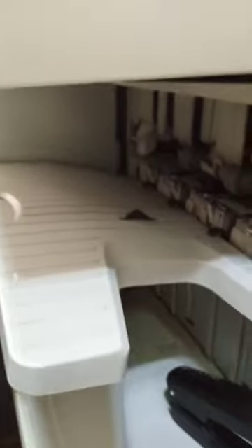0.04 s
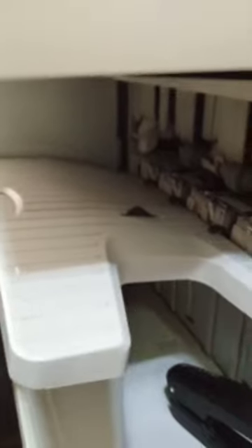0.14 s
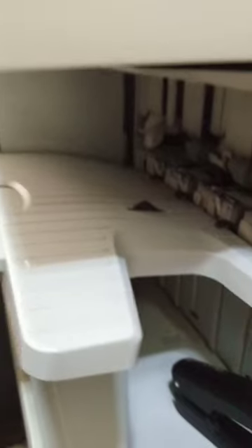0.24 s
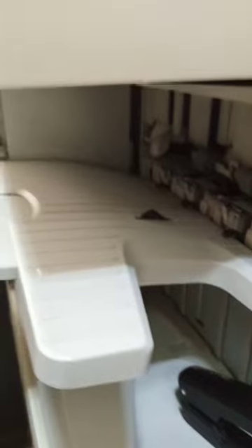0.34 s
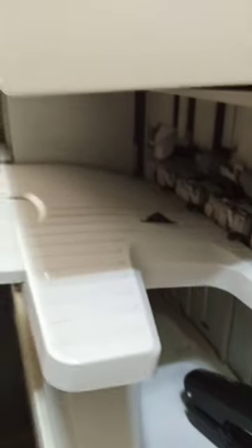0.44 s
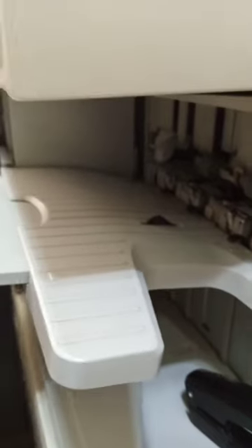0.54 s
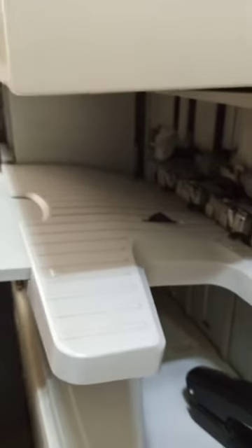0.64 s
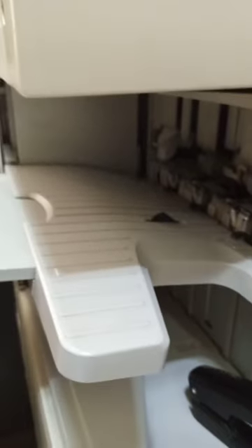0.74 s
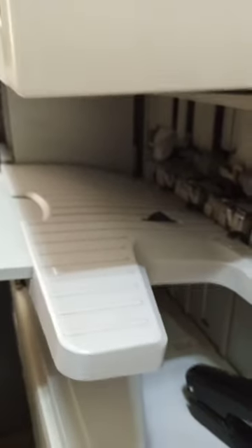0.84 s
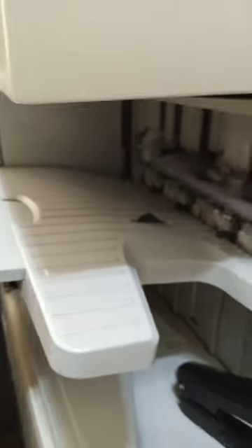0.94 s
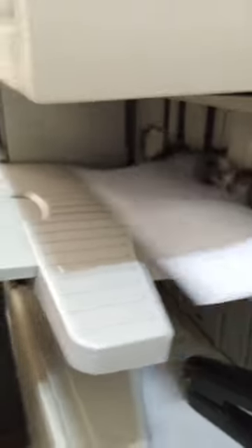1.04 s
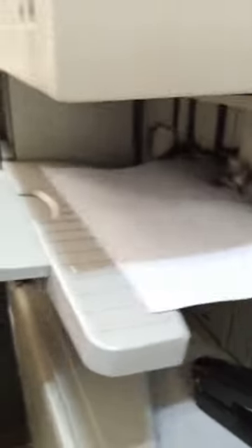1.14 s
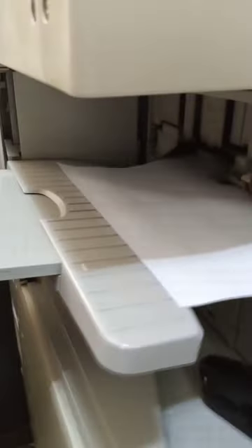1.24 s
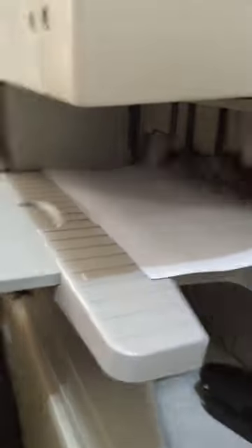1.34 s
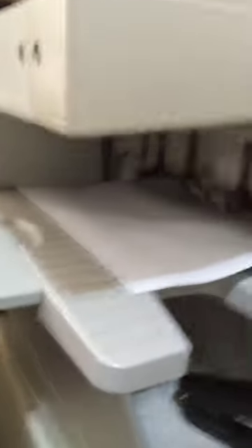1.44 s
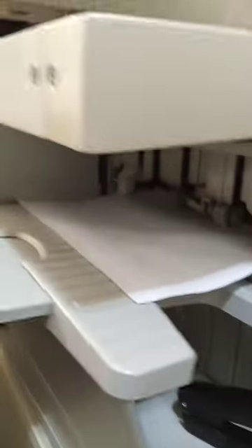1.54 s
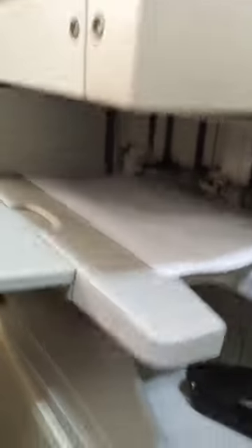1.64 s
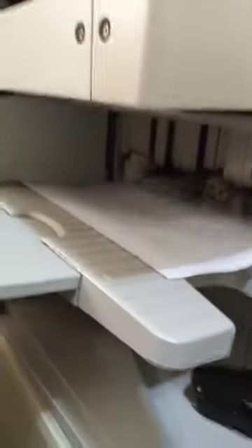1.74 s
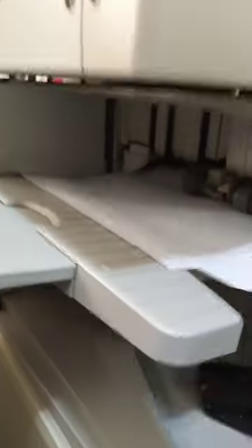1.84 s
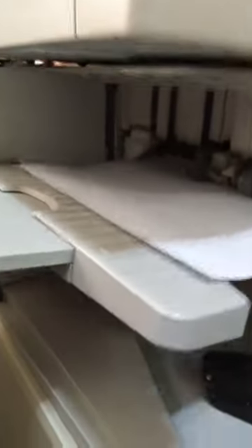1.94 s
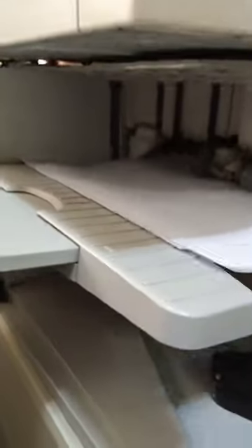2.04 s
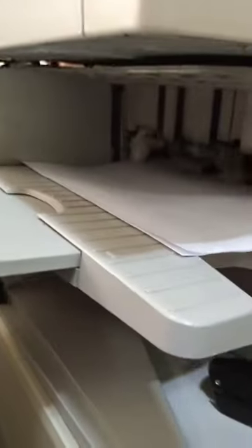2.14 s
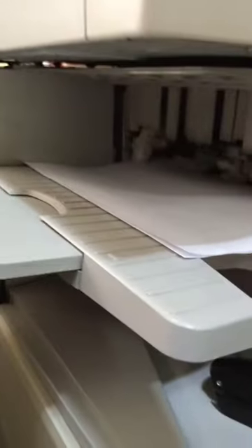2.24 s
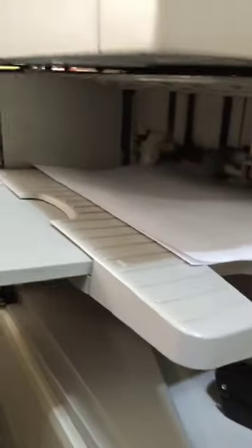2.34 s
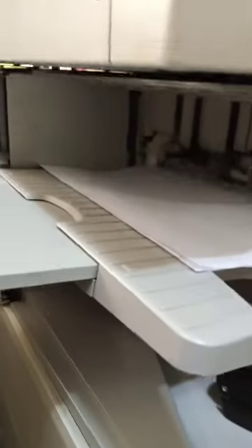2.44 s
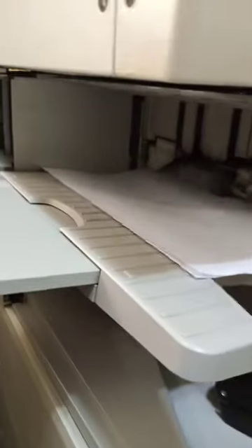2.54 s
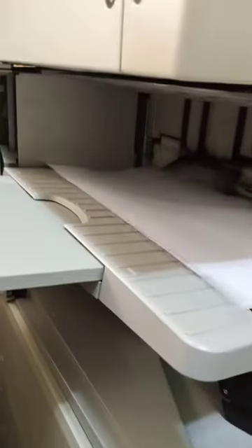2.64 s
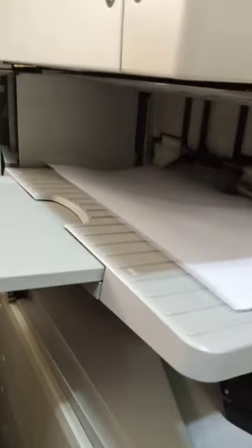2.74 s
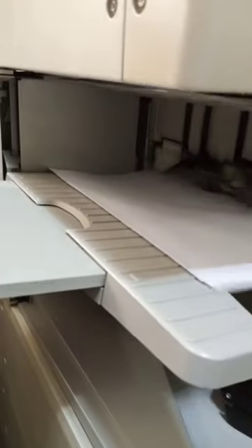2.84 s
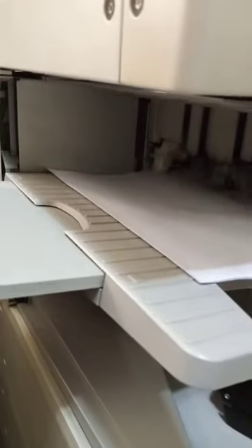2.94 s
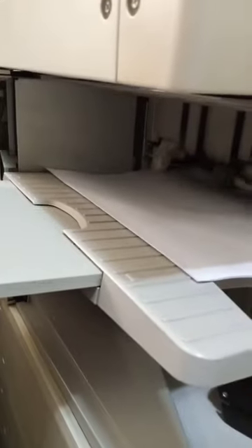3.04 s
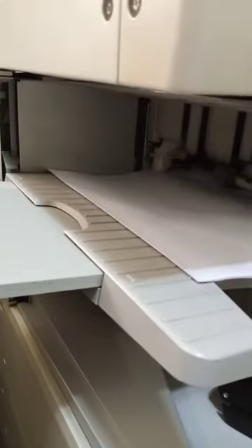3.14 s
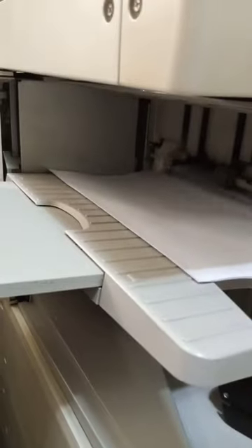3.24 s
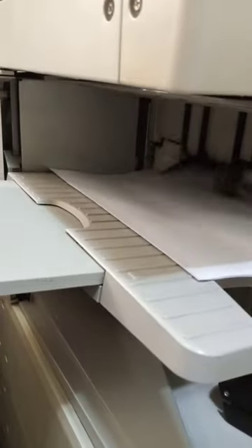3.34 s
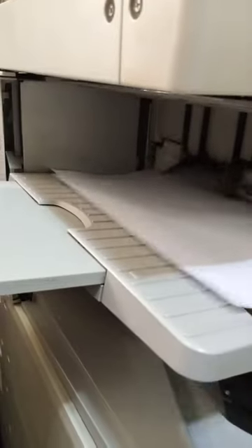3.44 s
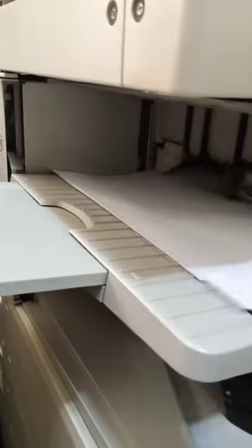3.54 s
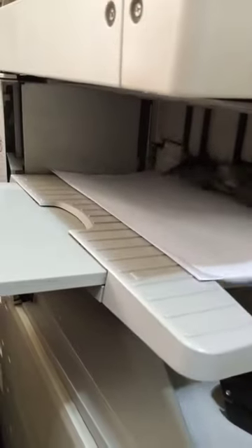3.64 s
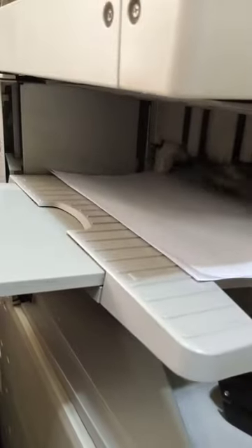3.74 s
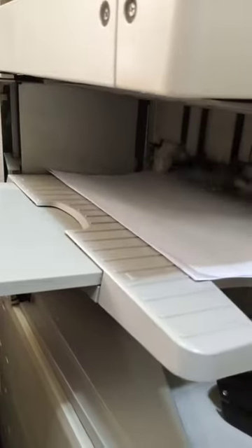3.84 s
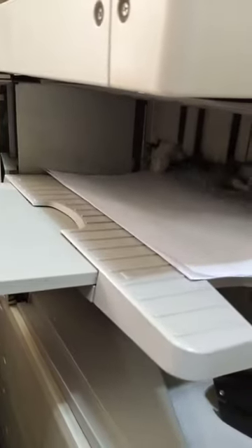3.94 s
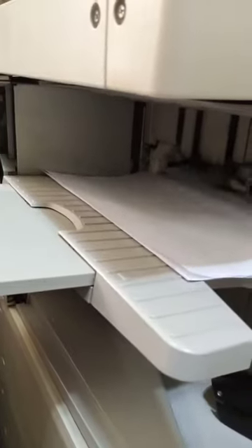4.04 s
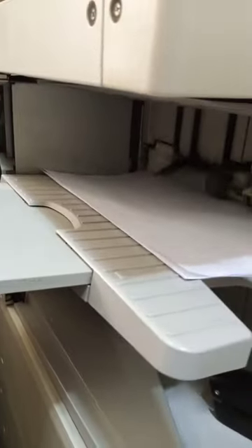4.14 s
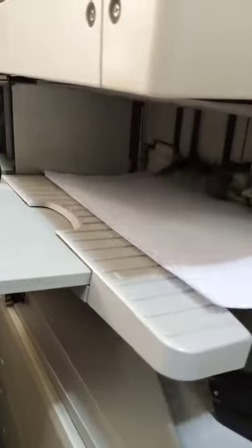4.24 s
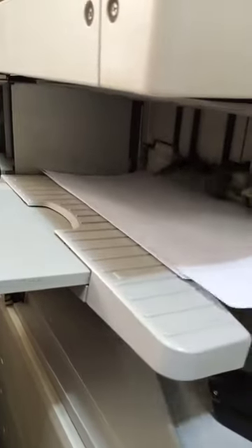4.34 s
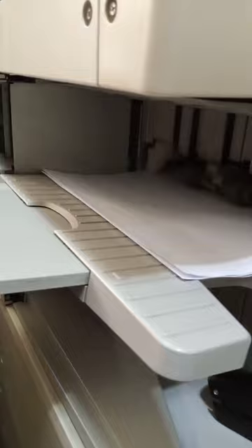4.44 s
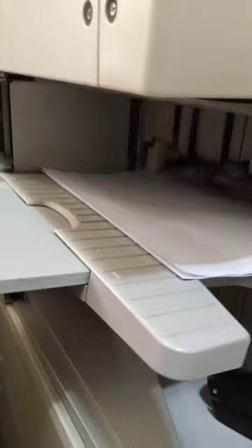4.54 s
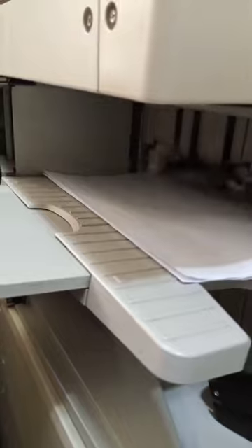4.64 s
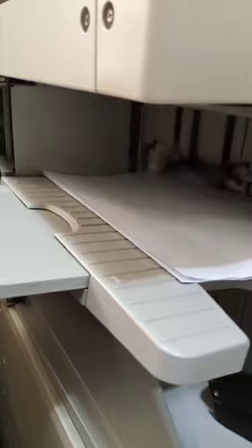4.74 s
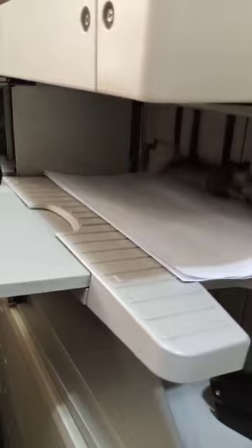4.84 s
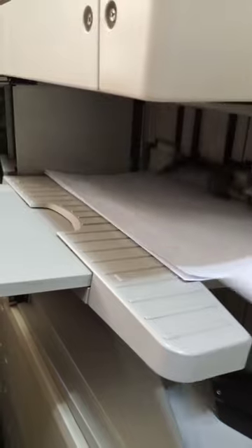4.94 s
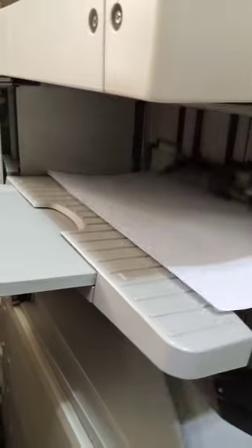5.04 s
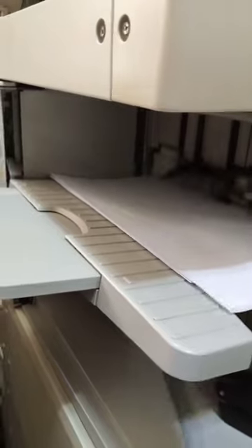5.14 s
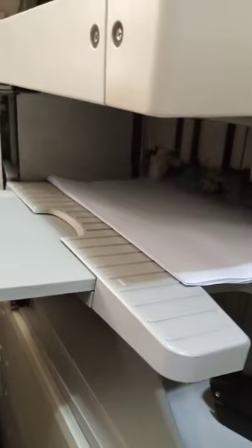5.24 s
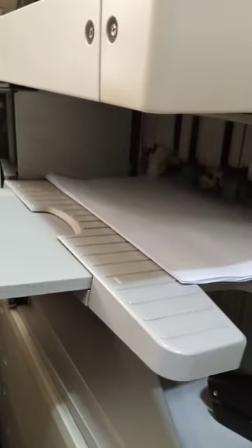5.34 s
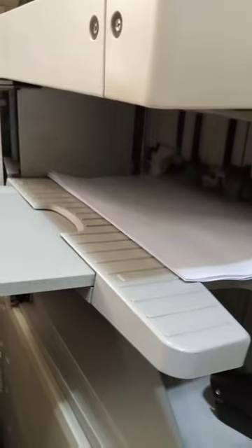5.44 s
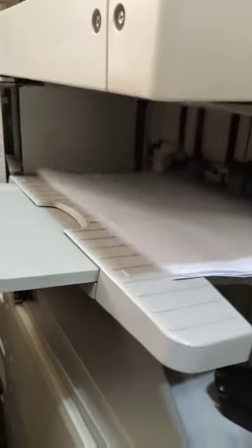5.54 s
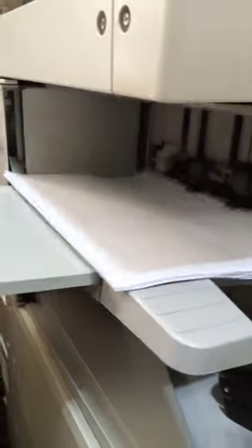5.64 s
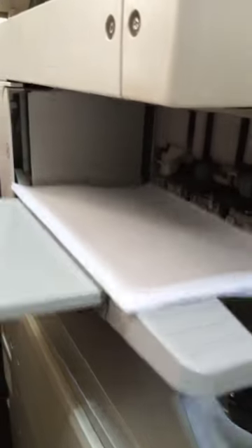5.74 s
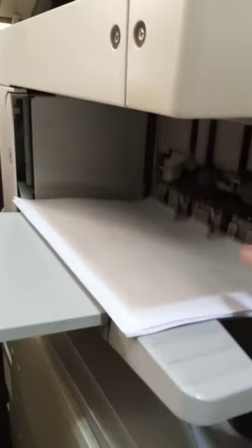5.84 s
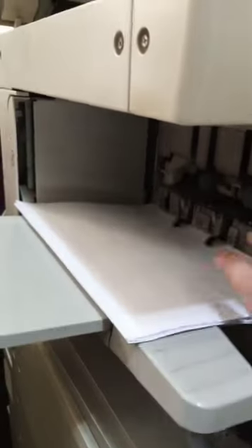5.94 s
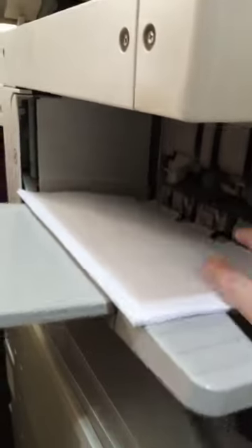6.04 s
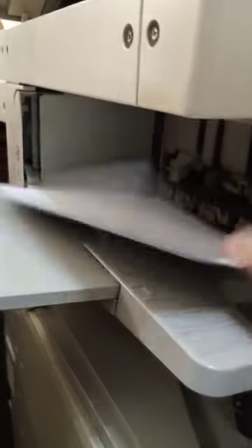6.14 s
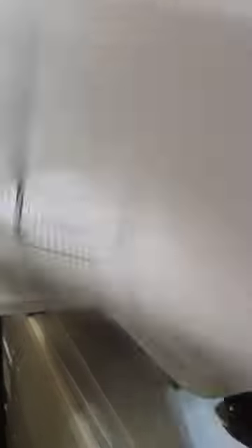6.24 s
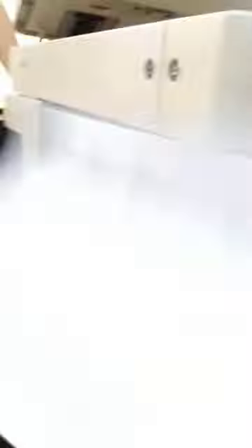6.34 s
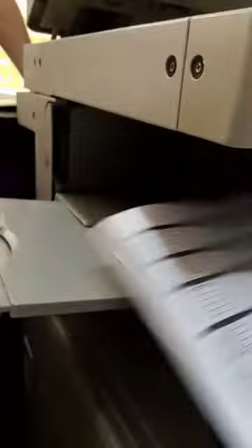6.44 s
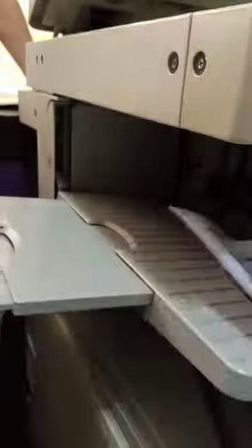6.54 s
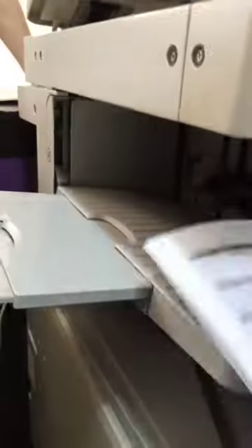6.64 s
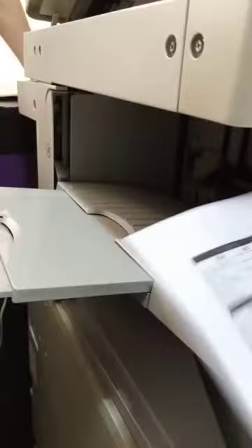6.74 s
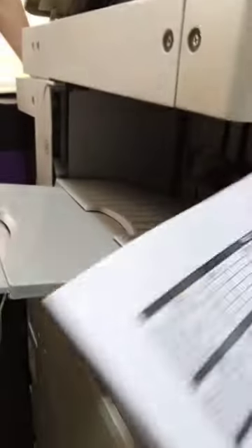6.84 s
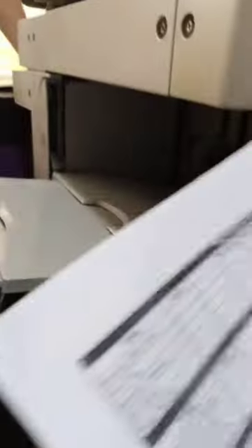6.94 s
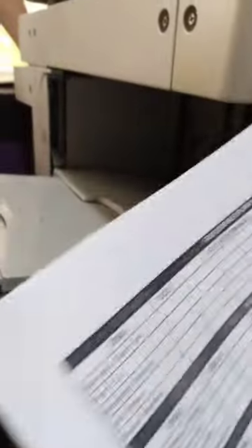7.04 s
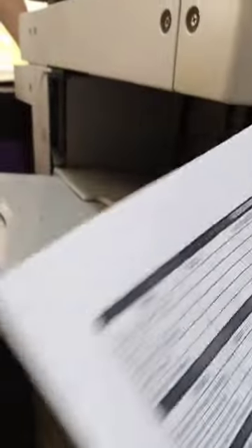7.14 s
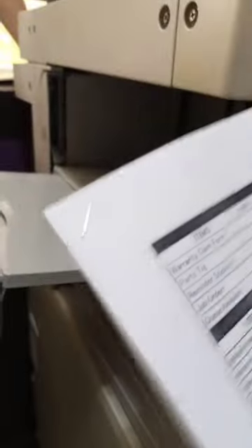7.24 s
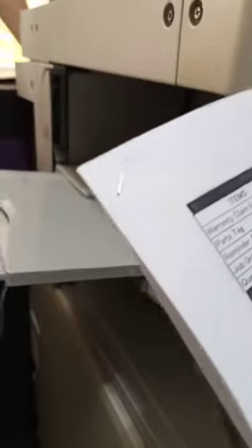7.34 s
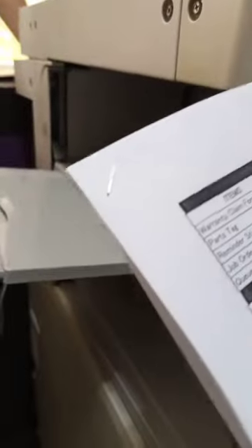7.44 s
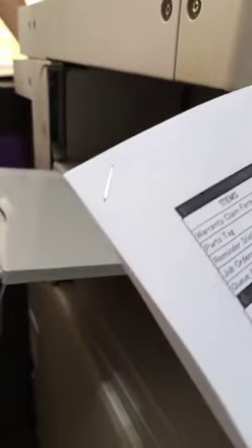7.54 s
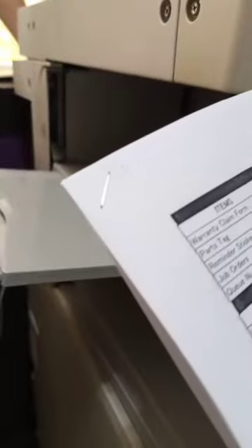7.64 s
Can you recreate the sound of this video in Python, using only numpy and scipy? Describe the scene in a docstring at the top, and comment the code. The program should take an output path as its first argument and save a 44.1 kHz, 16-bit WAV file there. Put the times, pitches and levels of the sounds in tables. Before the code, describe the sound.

A soft mechanical whirr with tiny high roller squeaks and dull cabinet knocks comes first. Then a regular cycle of paper slap, plastic fence tap and paired rubbery slaps repeats six times, with brief motor whines. Finally the stack is clamped, pushed out and handled, crackling and snapping irregularly. Close, dry microphone, very short room tail.

```python
"""A fan and a humming drive with thin roller squeaks and ticks, then sheets slapping onto a copier's finisher tray.
Paper slides as grainy friction noise; joggers, paddles and guides clack as noise bursts ringing through plastic.
The stapled set is pushed out and lifted by hand: each buckle is a crack with random modes of its own.
Fan and gears run throughout as coloured noise; the microphone is close to the plastic tray bay in a small office."""
import sys
import numpy as np
from scipy import signal
from scipy.fft import rfft, irfft, next_fast_len
from scipy.io import wavfile
from scipy.ndimage import uniform_filter1d, map_coordinates

SR = 44100
rng = np.random.default_rng(int(sys.argv[2]) if len(sys.argv) > 2 else 0)


def transcribe(u):
    """Save the signal u as a 16-bit wav file named by the first command-line argument.

    u: samples, shape (n,) or (channels, n), limited to [-1, 1]; the rate is SR.
    q: integer samples, one column per channel.
    """
    v = np.clip(np.atleast_2d(u).T, -1, 1)
    q = np.round(v * 32767).astype(np.int16)
    wavfile.write(sys.argv[1], SR, q)


N = 338688

# the sheets, each landing, jogged square and pulled back by two paddle blades: jog t/s, landing level/dB,
# landing f/Hz, landing t60/s, paddle delay after the jog/s, first and second blade level/dB, drag level/dB
SHEETS = [(1.294, -28.5, 3450, .095, 0.18, -24, -24.5, -40.5),
          (2.063, -26.5, 3290, 0.11, .183, -27.5, -34, -44),
          (2.829, -21.5, 3730, 0.05, 0.2, -22.5, -23.5, -46.5),
          (3.616, -24, 3540, 0.07, 0.19, -24, -31, -43),
          (4.387, -21.5, 2470, 0.03, 0.1987, -25, -24.5, -51),
          (5.173, -28, 2330, 0.07, 0.18, -23.5, -41, -47.5)]
# spectrum of cracking paper: f/Hz, density/dB
CRACK_SPECTRUM = [(900, -92), (1450, -18.5), (1750, -10), (2070, 4.5), (2400, 1), (2800, -4.5), (3900, 1.5),
                  (4450, 0), (5060, -14.5), (6000, -32), (7500, -39), (10000, -52)]
# spectrum of the fizz at a sheet's edge: f/Hz, density/dB
FIZZ_SPECTRUM = [(4000, -22.5), (5600, 10.5), (6600, -1), (8000, -15.5), (10000, -17), (13000, -25.5),
                 (14200, -13), (15200, -7.5), (15700, -10.5)]
# plastic walls of the tray bay: f/Hz, width/Hz, level/dB
BAY_WALLS = [(762, 70, 1), (980, 28, 2), (1291, 83, 4)]
# resonances of the gear train: f/Hz, width/Hz, level/dB
GEAR_MODES = [(2080, 240, 2), (2880, 120, -20), (3580, 320, -1), (4540, 290, -2.5), (5500, 540, -9.5)]
LEAD_S = 0.025  # run-up in every contact envelope before its peak


def landings(fizz_db=-27):
    """Each sheet drops from the exit rollers and slaps the tray."""
    lead_s = 0.166  # a sheet lands this long before its jog
    rows = [(s - lead_s, db, hz, fizz_db, t60) for s, db, hz, t60, *_ in SHEETS]
    return contacts(rows, crest_s=0.001, swell_s=0.0034, hold_s=0.0028, sheet_width_hz=31, sheet_share=1.8,
                    crack_db=-5.5, panel_db=-23, fizz_db=-0.5, tail_db=-30, tail_t60=0.16)


def jogger(crest_s=0.001064, level_db=-26.5):
    """From the second sheet on, a plastic fence slaps the edge of the stack; fence and bay walls ring."""
    # modes of the fence: f/Hz, width/Hz, level/dB
    fence_modes = [(1296, 150, -13), (2087, 184, -0.5), (2370, 84, 2), (2860, 100, -2.5), (3550, 126, -3),
                   (3680, 190, -1.5), (4210, 310, -3.5)]
    out = np.zeros(N)
    envelope = blow(swell_s=0.0065, hold_s=0.0061, t60=0.025, tail_db=-21, tail_t60=0.14)
    for s, *_ in SHEETS[1:]:
        ring = burst(lambda f: resonances(fence_modes, f) / (1 + (f / 5500) ** 8), envelope)
        panel = burst(lambda f: resonances(BAY_WALLS, f) * (f < 5000), envelope)
        fizz = burst(lambda f: amp(along(FIZZ_SPECTRUM, f)), envelope)
        slap = ring + amp(-13.5) * panel + amp(-16.5) * fizz
        add(out, s + crest_s - LEAD_S, amp(level_db) * slap)
    return out


def paddle():
    """Two rubber blades slap each sheet in turn; flaps and levers tap at fixed points of the cycle."""
    # light taps of flaps and levers: delay after the jog/s, level/dB, f/Hz
    cycle_taps = [(-.069, -31.5, 3960), (.325, -39.5, 4160), (.383, -44.5, 2300), (.535, -46, 2140)]
    blade_gap_s, blade_hz, blade_t60, blade_fizz_db = 0.051, 3913, 0.068, -16.5
    tap_t60, tap_fizz_db = 0.042, -23
    rows = []
    for s, *_, delay, first_db, second_db, _ in SHEETS:
        for k, db in enumerate([first_db, second_db]):
            rows.append((s + delay + k * blade_gap_s, db, blade_hz, blade_fizz_db, blade_t60))
        rows += [(s + after, db, hz, tap_fizz_db, tap_t60) for after, db, hz in cycle_taps]
    return contacts(rows, crest_s=0.001, swell_s=0.0056, hold_s=0.0028, sheet_width_hz=38, sheet_share=2.0,
                    crack_db=-6, panel_db=-37, fizz_db=-1.5, tail_db=-32, tail_t60=0.15)


def clacks():
    """Sheets catch on the guides and the stack is clamped and stapled, each a short crack."""
    # the catches, clamping and stapling: t/s, level/dB, f/Hz, relative fizz/dB, t60/s
    clack_rows = [(1.2531, -24.5, 2460, -26, 0.018), (1.273, -21.5, 1976, -34.5, 0.038),
                  (2.0333, -30.5, 2370, -27, 0.052), (2.1326, -27.5, 4000, -22, 0.18),
                  (2.9437, -22, 2740, -14, 0.019), (3.6915, -30, 4170, -31, 0.022),
                  (3.7174, -29.5, 3980, -15, 0.033), (4.4662, -29, 4330, -22.5, 0.15),
                  (5.2285, -31, 4270, -21, .034), (5.2674, -23.5, 4470, -15, .027),
                  (5.5209, -19.5, 2730, -26, 0.062), (5.6146, -21, 2313, -31, 0.085)]
    return contacts(clack_rows, crest_s=0.000984, swell_s=0.0035, hold_s=0.0026, sheet_width_hz=29,
                    sheet_share=1.1, crack_db=-5.5, panel_db=-31, fizz_db=0.0, tail_db=-46, tail_t60=0.15)


def snaps():
    """The stapled set buckles as it is pushed out and lifted, snapping from one bend to another."""
    # the buckles: t/s, level/dB, f/Hz, relative fizz/dB, t60/s
    snap_rows = [(5.7508, -29, 4500, -19, 0.096), (5.7967, -27, 2150, -16.5, 0.054),
                 (5.8232, -21, 2380, -30, .04), (5.8466, -25, 2460, -11, 0.073),
                 (5.8681, -17, 2100, -15, 0.088), (5.9574, -19, 3350, -24, 0.019),
                 (5.9853, -23.5, 2140, -24, 0.15), (6.0995, -23, 2100, -23, .045),
                 (6.1154, -25.5, 2130, -22, 0.11), (6.2422, -26.5, 2050, -24, 0.098),
                 (6.2594, -24, 1950, -19.5, 0.035), (6.2851, -26.5, 4070, -6.5, 0.044),
                 (6.334, -29.5, 2300, -11, 0.097), (6.5201, -20.5, 1850, -23.5, 0.04),
                 (6.5535, -26, 2040, -7.5, .043), (6.5889, -15, 2400, -20.5, 0.093),
                 (6.6333, -14, 2130, -22, 0.046), (6.8418, -25.5, 2340, -15, 0.097),
                 (6.8668, -23.5, 2600, -13, 0.082), (6.9785, -33.5, 3950, -7.5, 0.13),
                 (7.0549, -34, 2250, -3.5, 0.081), (7.0754, -30.5, 2180, -9, .03),
                 (7.2389, -23.5, 2370, -14, 0.068)]
    return contacts(snap_rows, crest_s=0.0005, swell_s=0.0034, hold_s=0.003, sheet_width_hz=39,
                    sheet_share=0.24, crack_db=-6.5, panel_db=-25, fizz_db=-7.5, tail_db=-26.0, tail_t60=0.18)


def contacts(rows, crest_s, swell_s, hold_s, sheet_width_hz, sheet_share, crack_db, panel_db, fizz_db,
             tail_db, tail_t60, spread_oct=1.0):
    """A bent sheet cracks with modes of its own each time, shakes the bay's walls and fizzes at its edge."""
    out = np.zeros(N)
    for s, db, centre_hz, fizz_rel, t60 in rows:
        # a contact that dies sooner also starts more abruptly
        swell = swell_s * (t60 / 0.041) ** 0.75
        envelope = blow(swell, hold_s, t60, tail_db, tail_t60)
        # one mode at the centre, seven more within about an octave of it
        octaves = np.append(0, rng.uniform(-0.998, 1, size=7))
        sheet = [(hz, sheet_width_hz, 0) for hz in centre_hz * 2 ** octaves]
        focus = lambda f: np.exp(-0.5 * (np.log2((f + 1) / centre_hz) / spread_oct) ** 2)
        # a stiffer bend puts its energy higher up
        tilt = lambda f: (np.maximum(f, 1000) / 3000) ** (2 * np.log2(centre_hz / 2800))
        ring = lambda f: 1 + sheet_share * np.abs(resonances(sheet, f))
        crack = burst(lambda f: amp(along(CRACK_SPECTRUM, f)) * focus(f) * tilt(f) * ring(f), envelope)
        panel = burst(lambda f: resonances(BAY_WALLS, f) * (f < 5000), envelope)
        fizz = burst(lambda f: amp(along(FIZZ_SPECTRUM, f)), envelope)
        sound = amp(crack_db) * crack + amp(panel_db) * panel + amp(fizz_rel + fizz_db) * fizz
        add(out, s + crest_s - LEAD_S, amp(db) * sound)
    return out


def blow(swell_s, hold_s, t60, tail_db, tail_t60):
    """Envelope of a soft contact that peaks at LEAD_S: swell, a moment of scraping, fall, faint flutter."""
    t = np.arange(SR // 6) / SR - LEAD_S
    after, before = np.maximum(t - hold_s, 0), np.minimum(t, 0)
    fall = amp(-60 * after / max(t60, 1e-3))
    flutter = amp(tail_db - 60 * after / tail_t60)
    return np.exp(2 * before / swell_s) * (fall + flutter)


def sliding(grain_db=5.5, patchy_db=7.0, crackle_rate=130, crackle_db=-5, hiss_db=1.5, wall_db=-13):
    """Paper catches and slips: a grainy hiss of friction, with tiny buckles scattered through it."""
    # rubbing as each sheet glides in and is pushed sideways: delay after the jog/s, length/s, level/dB
    cycle_rubs = [(-.19, 0.18, -51), (0, .12, -52)]
    # longer slides, of the first sheet over the bare tray and of the finished set: t/s, length/s, level/dB
    strokes = [(1.29, 0.16, -51.5), (5.39, .13, -48.5), (5.528, 0.056, -39), (5.83, 0.197, -41),
               (6.254, 0.22, -52), (6.6, 0.17, -48), (6.784, 0.18, -44.5)]
    # spectrum of the friction hiss: f/Hz, density/dB
    paper_spectrum = [(400, -20), (950, -14), (1450, -12.5), (2130, 8), (2700, -3.5), (3700, -0.5),
                      (4500, 0.5), (5200, -10), (6300, -15.5), (8000, -34.5), (13000, -42), (15200, -29)]
    drag_s = 0.1147  # how long the paddle drags a sheet
    drags = [(s + delay, drag_s, drag_db) for s, *_, delay, _, _, drag_db in SHEETS]
    pressure = np.zeros(N)
    for s, length, db in each_sheet(cycle_rubs) + drags + list(strokes):
        add(pressure, s, amp(db) * signal.windows.tukey(int(length * SR), 0.4))

    # slow slips under a fast grain
    slips_db = 2.4 * wobble(45)
    grains = unit(amp(grain_db * np.tanh(wobble(220)) + slips_db))
    hiss = grains * patchy(lambda f: amp(along(paper_spectrum, f)), patchy_db)

    # crackle_rate buckles a second on average, each a brief flutter
    buckles = (rng.random(N) < crackle_rate / SR) * rng.uniform(0.25, 1, N)
    t = np.arange(SR // 40) / SR
    flutter = signal.fftconvolve(buckles, t * np.exp(-t / 0.0019))[:N]
    rustle = flutter * patchy(lambda f: f < 8000, patchy_db)
    crackle = unit(filtered(rustle, lambda f: amp(along(CRACK_SPECTRUM, f))))

    # the rubbing also drives the bay's walls
    walls = unit(filtered(hiss, lambda f: resonances(BAY_WALLS, f) * (f < 1700)))
    return pressure * (amp(hiss_db) * hiss + amp(crackle_db) * crackle + amp(wall_db) * walls)


def squeaks(width_hz=90, length=0.036, pitch_scatter=0.014, scatter_db=4.5):
    """A dry roller sings in one narrow band, a little differently on each turn."""
    # spells of squeaking: t/s, length/s, mean f/Hz, level/dB before a 3 dB cut and scatter
    spells = [(0.03, .11, 7400, -59), (0.35, .05, 7420, -65), (0.9, .3, 7440, -68.5),
              (1.764, .11, 7310, -51), (2.161, .27, 7320, -53), (3.179, .27, 7300, -57.5),
              (4.039, .27, 7500, -59.5)]
    turn_s = 0.0784
    out, envelope = np.zeros(N), np.hanning(int(length * SR))
    for start, spell, pitch_hz, db in spells:
        for s in np.arange(start, start + spell, turn_s):
            hz = pitch_hz * (1 + pitch_scatter * rng.standard_normal())
            chirp = burst(lambda f: np.exp(-0.5 * ((f - hz) / width_hz) ** 2), envelope)
            level_db = db - 3 + scatter_db * rng.standard_normal()
            add(out, s - 0.011, amp(level_db) * chirp)
    return out


def steppers():
    """Each stepper motor run is an unsteady, rattling whine: a sine of drifting pitch and level."""
    # short motor runs: t/s, length/s, mean f/Hz, mean level/dB
    motor_runs = [(.762, 0.052, 1185, -59.5), (3.09, 0.091, 1168, -53), (4.14, .044, 1730, -54),
                  (4.78, .18, 1770, -59), (5.08, 0.33, 1170, -58.5), (6.1, .14, 1185, -55.5),
                  (6.42, 0.12, 1760, -56), (7.107, 0.039, 1740, -57.5), (7.36, 0.078, 1746, -57),
                  (7.55, 0.1, 1800, -57)]
    # the paddle's motor: delay after the jog (s), length (s), mean pitch (Hz), mean level (dB)
    paddle_runs = each_sheet([(0.205, 0.092, 980, -58.5)])
    out = np.zeros(N)
    drift = 1 + 0.0077 * wobble(160)
    rattle = unit(amp(6.1 * wobble(70)))
    for s, length, hz, db in paddle_runs + list(motor_runs):
        turning = drift[int(s * SR):][:int(length * SR)]
        phase = 2 * np.pi * hz * np.cumsum(turning) / SR
        whine = np.sqrt(2) * np.sin(phase)
        add(out, s, amp(db) * whine * signal.windows.tukey(len(phase), 0.5))
    return out * rattle


def ticks():
    """Gears tick deep inside the machine, faintly and unevenly while paper is on its way."""
    # the clearest gear ticks: t/s, level/dB before a 5.5 dB cut
    clear_ticks = [(.035, -49), (.16, -47), (.183, -40.5), (.341, -48), (3.989, -46), (4.92, -47.5),
                   (5.7125, -38), (6.4622, -41)]
    rate, faint_db, scatter_db, end_s = 7.6, -51, 3, 5  # fainter ones: a second, level before the cut, +-, until
    out = np.zeros(N)
    envelope = blow(swell_s=0.0063, hold_s=0.0037, t60=0.042, tail_db=-19, tail_t60=0.1)
    draws = rng.random((int(end_s * rate), 2))
    # one at a random moment in each slot of 1/rate seconds
    faint = [((k + u) / rate, faint_db + scatter_db * (1 - 2 * v)) for k, (u, v) in enumerate(draws)]
    for s, db in list(clear_ticks) + faint:
        tick = burst(lambda f: resonances(GEAR_MODES, f) / (1 + (f / 6000) ** 8), envelope)
        add(out, s - LEAD_S, amp(db - 5.5) * tick)
    return out


def knocks(count=5):
    """The feed clutch, upstream of the tray, knocks in the cabinet, along with a few other hits, the first of
    them the first sheet landing on the bare tray; all ring the cabinet's walls."""
    # further knocks, the first as the first sheet lands on the bare tray: t/s, level/dB before a 2.5 dB lift
    other_knocks = [(1.13, -39), (5.545, -36.5), (5.573, -40.5), (6.519, -42.5)]
    # modes of the cabinet: f/Hz, width/Hz, level/dB
    cabinet_modes = [(250, 56, -1.5), (358, 61, 1.5), (566, 200, -4), (655, 68, 4.5), (910, 49, 0.5),
                     (1220, 50, -3), (2090, 400, 1)]
    start_s, period_s, feed_db = 0.642, 0.778, -37.5  # the clutch's, level before the same lift
    out, t = np.zeros(N), np.arange(SR // 5) / SR
    envelope = (1 - np.exp(-t / 0.0027)) * amp(-60 * t / 0.078)
    feeds = [(start_s + k * period_s, feed_db) for k in range(count)]
    for s, db in feeds + list(other_knocks):
        knock = burst(lambda f: resonances(cabinet_modes, f) / (1 + (f / 4000) ** 4), envelope)
        add(out, s, amp(db + 2.5) * knock)
    return out


def running():
    """The drive throbs in the cabinet while the fan blows and the gear train whirrs and whines."""
    # drive hum: t/s, level/dB before a 1 dB cut and wobble
    hum_levels = [(0.0, -76), (1.11, -58), (1.28, -76.5), (1.35, -47), (1.45, -79), (1.82, -59),
                  (1.97, -69.5), (3.59, -72.5), (3.68, -57), (3.74, -70), (5.35, -81), (5.71, -59),
                  (5.75, -77), (6.03, -61.5), (6.29, -78), (6.42, -53.5), (6.46, -77), (7.68, -76)]
    # fan and gears: t/s, level/dB before wobble
    running_levels = [(0, -57.5), (2.5, -57), (4.9, -60), (6.4, -59), (7.3, -61.5)]
    # spectrum of the fan: f/Hz, density/dB
    fan_spectrum = [(20, -15.5), (96, -1), (200, 0.5), (500, -4.5), (1000, -8), (1600, -6.5), (2240, 0.5),
                    (2700, -14), (4500, -17), (6000, -28.5), (8000, -47), (15000, -51)]
    # tones of the meshing gears: f/Hz, level/dB relative to the fan
    gear_tones = [(1841, -17), (2202, -20), (3677, -20)]
    (hum_db,), (fan_db,) = curves(hum_levels), curves(running_levels)
    throb = noise(lambda f: resonances([(96.3, 33, 0)], f) ** 2)
    hum = amp(hum_db - 1 + 4.2 * wobble(9)) * throb
    fan = amp(fan_db + wobble(15)) * patchy(lambda f: amp(along(fan_spectrum, f)), depth_db=4.5)
    gears = patchy(lambda f: resonances(GEAR_MODES, f) / (1 + (f / 5500) ** 8), depth_db=4)
    whirr = amp(2 * wobble(30)) * gears
    whine = sum(amp(db) * noise(lambda f: resonances([(hz, 45, 0)], f) ** 2) for hz, db in gear_tones)
    return hum + fan + amp(fan_db) * (amp(-14.0) * whirr + whine)


def office(x):
    """A short room tail of decaying noise, treble dying first."""
    # decay of the room: f/Hz, t60/s
    room_decay = [(200, 0.15), (2000, 0.13), (6000, 0.13), (14000, 0.047)]
    hz, t, z = signal.stft(rng.standard_normal(SR // 2), SR, nperseg=256)
    decay = amp(-60 * t / along(room_decay, hz)[:, None])
    tail = signal.istft(z * decay, SR, nperseg=256)[1]
    return signal.fftconvolve(x, tail / np.linalg.norm(tail))[:N]


def each_sheet(rows):
    """Repeat (delay, ...) rows for every sheet, timed from its jog."""
    return [(s + delay, *rest) for s, *_ in SHEETS for delay, *rest in rows]


def burst(response, envelope):
    """Noise under an envelope rings through a body; the result carries the envelope's energy."""
    m = next_fast_len(len(envelope) + SR // 20)
    push = rfft(rng.standard_normal(len(envelope)) * envelope, m)
    body = causal(np.abs(response(np.fft.rfftfreq(m, 1 / SR))), m)
    return unit(irfft(push * body, m)) * np.sqrt(np.sum(envelope ** 2) / m)


def causal(gain, size):
    """Minimum-phase response of a gain curve: the body rings only after it is struck."""
    cepstrum = irfft(np.log(np.maximum(gain / gain.max(), 1e-6)), size)
    cepstrum[1:size // 2] *= 2
    cepstrum[size // 2 + 1:] = 0
    return np.exp(rfft(cepstrum))


def resonances(modes, f):
    """Causal response of (Hz, width, dB) modes, with alternating signs."""
    return sum((-1) ** k * amp(db) * 1j * f * w / (c * c - f * f + 1j * f * w)
               for k, (c, w, db) in enumerate(modes))


def patchy(response, depth_db):
    """Coloured noise of rms 1 in which brief resonances come and go."""
    z = signal.stft(rng.standard_normal(N), nperseg=1024)[2]
    # random gains smoothed over neighbouring frequencies, then over time
    field = uniform_filter1d(rng.standard_normal(z.shape), size=3, axis=0)
    field = uniform_filter1d(field, size=4, axis=1)
    flickering = signal.istft(z * amp(depth_db * unit(field)), nperseg=1024)[1][:N]
    return unit(filtered(flickering, response))


def noise(response, size=N):
    """Coloured noise of rms 1."""
    return unit(filtered(rng.standard_normal(size), response))


def filtered(x, response):
    """x times a complex response of frequency."""
    m = next_fast_len(len(x) + SR // 10)
    return irfft(rfft(x, m) * response(np.fft.rfftfreq(m, 1 / SR)), m)[:len(x)]


def wobble(rate):
    """A smooth random curve, rate knots a second."""
    return map_coordinates(rng.standard_normal(int(N * rate / SR) + 4), [np.arange(N) * rate / SR])


def curves(rows):
    """One value per sample for each column after the time."""
    s, *cols = np.transpose(rows)
    return [np.interp(np.arange(N) / SR, s, c) for c in cols]


def along(points, hz):
    """(Hz, value) points read on a log axis."""
    f, v = np.transpose(points)
    return np.interp(np.log(hz + 1), np.log(f + 1), v)


def amp(db):
    """Decibels to gain."""
    return 10 ** (np.asarray(db) / 20)


def unit(x):
    """Scale to rms 1."""
    return x / np.sqrt(np.mean(x ** 2) + 1e-20)


def add(track, s, sound):
    """Mix a sound into the track from time s on."""
    start = max(round(s * SR), 0)
    part = track[start:start + len(sound)]
    part += sound[:len(part)]


def scene():
    """Mechanism and paper close to the microphone with a faint office tail, over the running machine."""
    paper = landings() + clacks() + snaps() + sliding()
    mechanism = jogger() + paddle() + squeaks() + steppers() + ticks() + knocks()
    near = paper + mechanism
    return (near + amp(-14.5) * office(near) + running())[None]


def record(dry):
    """The recorder keeps nothing above its band limit."""
    top_hz = 15800
    return np.array([filtered(channel, lambda hz: hz < top_hz) for channel in dry])


dry = scene()
out = record(dry)
transcribe(out)
```